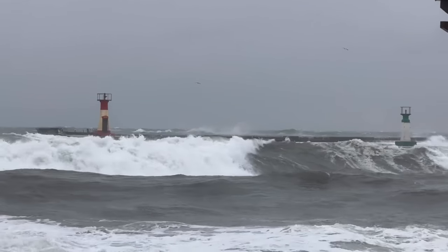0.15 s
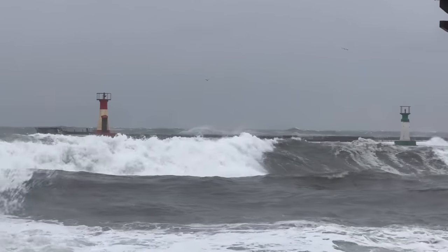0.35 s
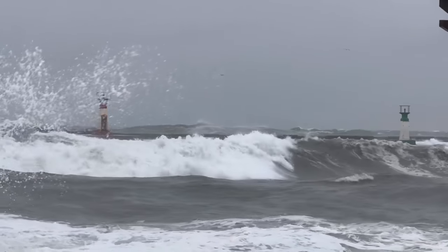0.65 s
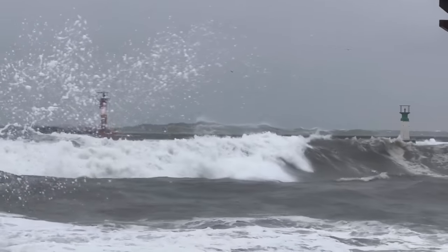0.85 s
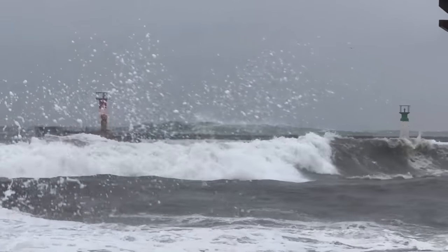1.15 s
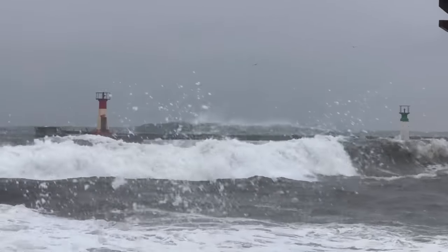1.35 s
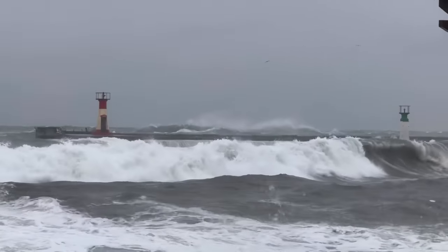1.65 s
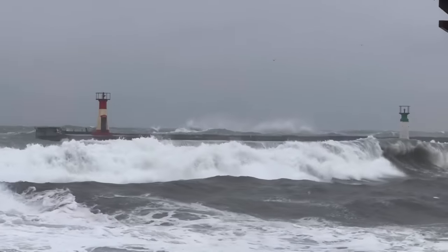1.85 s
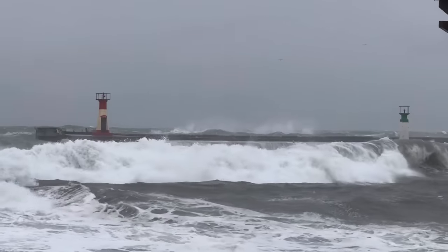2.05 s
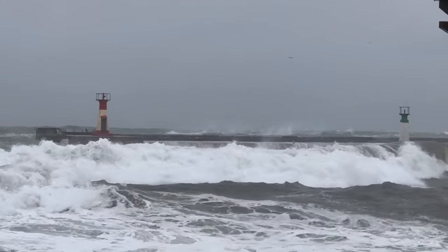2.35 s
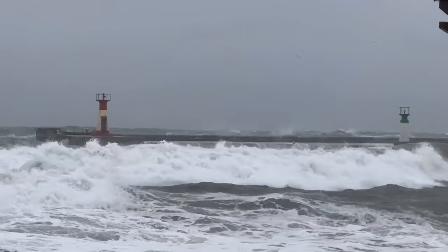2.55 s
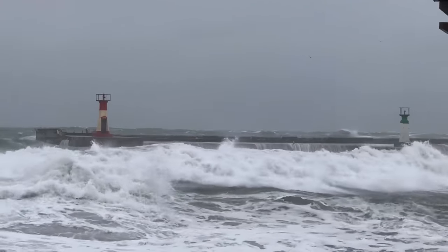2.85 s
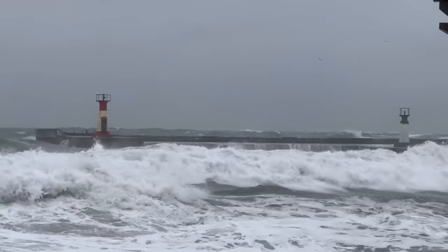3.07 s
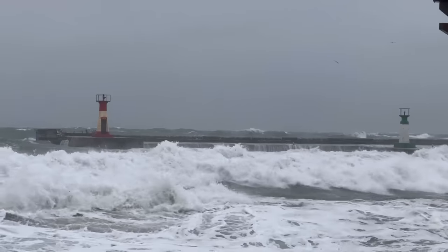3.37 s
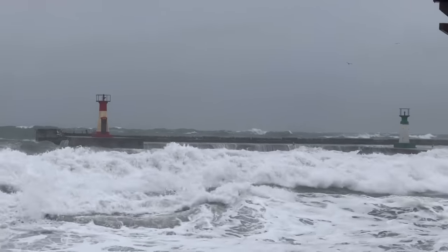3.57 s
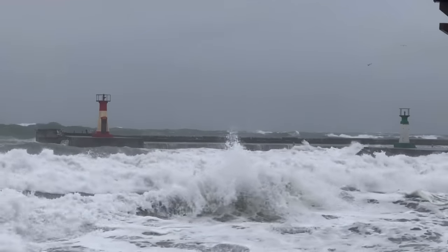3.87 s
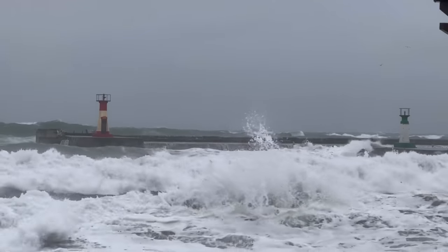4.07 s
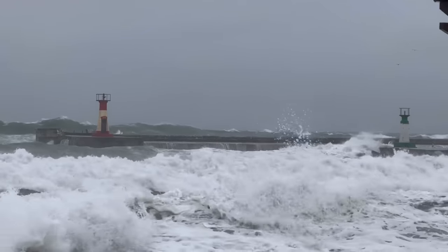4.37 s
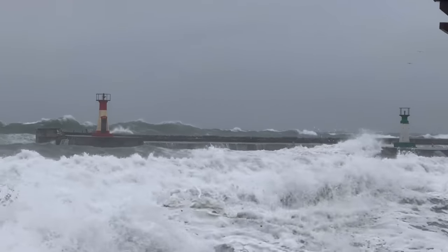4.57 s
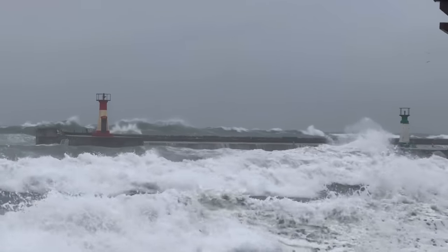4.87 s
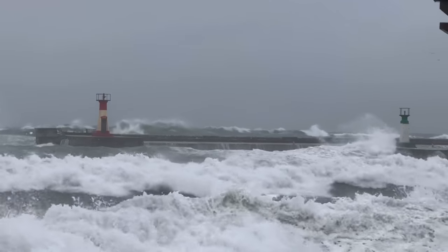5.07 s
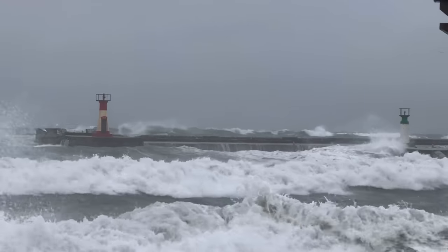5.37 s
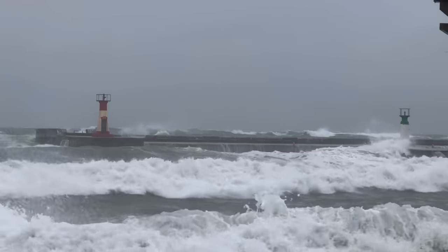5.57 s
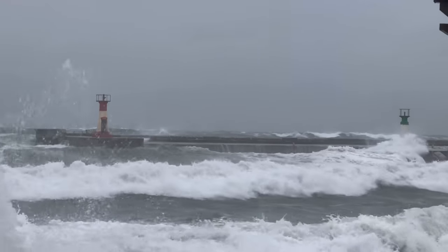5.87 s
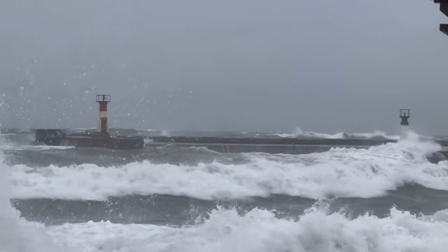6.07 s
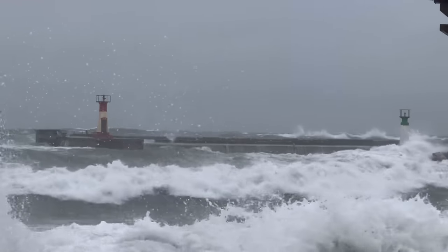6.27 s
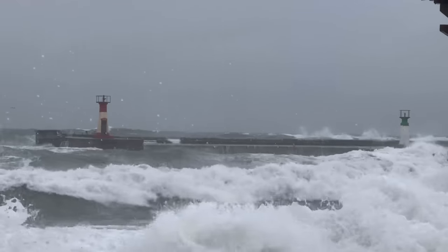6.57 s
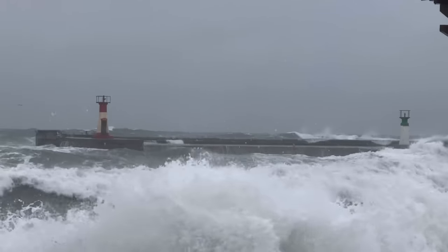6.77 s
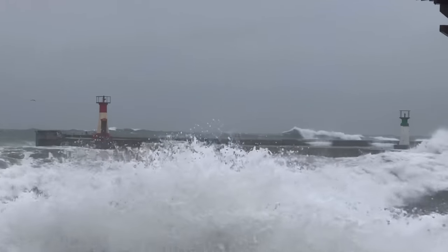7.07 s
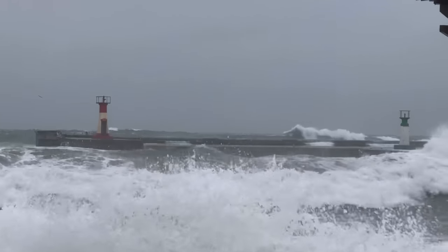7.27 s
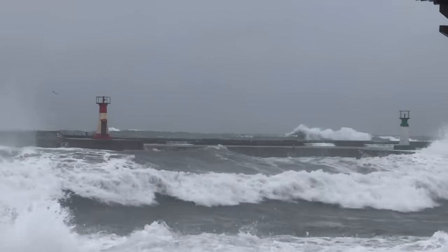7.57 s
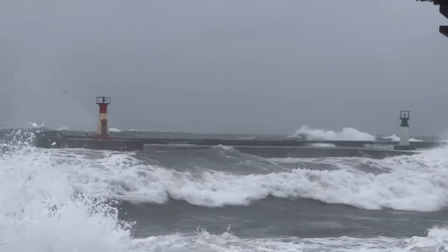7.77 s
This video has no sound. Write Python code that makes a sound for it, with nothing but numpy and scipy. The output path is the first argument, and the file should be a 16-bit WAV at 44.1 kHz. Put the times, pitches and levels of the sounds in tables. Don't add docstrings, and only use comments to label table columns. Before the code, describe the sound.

Lumpy low wind rumble buffets the microphone, with sharp downward-sliding pops, over a dull, patchy roar of slowed storm surf.

```python
import sys
import numpy as np
from scipy import signal
from scipy.fft import rfft, irfft
from scipy.io import wavfile
from scipy.ndimage import uniform_filter1d, minimum_filter1d

SR = 44100
rng = np.random.default_rng(int(sys.argv[2]) if len(sys.argv) > 2 else 0)


def digitize_waveform(pressure):
    field = np.atleast_2d(pressure).T
    bounded = np.clip(field, -1, 1)
    quanta = np.round(bounded * 32767).astype(np.int16)
    wavfile.write(sys.argv[1], SR, quanta)


def boost_factor(decibels):
    exponent = np.asarray(decibels, float) / 20
    return 10 ** exponent


N = 349272
STEP = 40
CONTROL_S = np.arange(0, N + STEP, STEP) / SR
HZ = np.maximum(np.fft.rfftfreq(N, 1 / SR), 1)
OCTAVES = np.log2(HZ)

# (lower edge [Hz], upper edge [Hz])
GUST_BANDS_HZ = [
    (25, 70),
    (70, 150),
    (150, 330),
]
# (frequency [Hz], density [dB per Hz])
GUST_COLOUR = [(20, -29.5), (35, -13), (55, 3), (70, 5.5), (100, 2), (150, -4.5), (230, -15.5), (330, -21),
               (500, -25.5), (800, -38), (1200, -59.5)]


def gusts():
    colour_db = at_hz(GUST_COLOUR + [(1500, -99)], HZ)
    swirl_db = in_time(WIND)[2]
    return turbulence(colour_db, GUST_BANDS_HZ, eddies(), swirl_db, lean=0.27, cavity_share=.3,
                      steady=0.69, cycles=2.5, shared_db=1.95, own_db=2.0, rate=14)


# (time [s], strength [dB], weight of the largest eddies [dB], extra unshared swirl [dB])
WIND = [(0, -24, -15.5, 4.5), (.3, -32.5, -9, 5), (.58, -30.5, -11, 3.5), (.9, -30, -3, 8.5),
        (1.3, -29, -1.5, -4), (1.8, -29, -3, -5.5), (2.4, -24, -2.5, -7.5), (3.2, -28.5, 1, -3),
        (3.7, -23, -3, 4.5), (4.3, -22.5, -5, 3), (4.6, -20.5, -8, 1.5), (5.1, -24, -1, 5),
        (5.6, -22.5, -6, 5), (5.85, -28, -6, 8), (6.05, -30, -6.5, -1.5), (6.5, -24.5, -6.5, -1.5),
        (7.1, -28.5, -3.5, -5), (7.9, -28, -6, -1)]
# (time [s], lift [dB], pitch [Hz], length [s])
LUMPS = [(0.008, 9, 95, .05), (0.343, 6.5, 200, 0.054), (0.445, 7.5, 99, 0.027), (0.722, 9.5, 200, 0.039),
         (0.906, 9, 92.6, .07), (0.988, 14.5, 70, 0.062), (1.224, 9, 101, 0.052), (1.614, 6.5, 76, 0.15),
         (1.67, 8.5, 45, 0.091), (2.05, 1.5, 70, 0.14), (2.31, -3, 50, .1), (2.554, 1, 50, 0.038),
         (2.726, 12, 80, 0.041), (3.004, 9, 68, 0.063), (3.14, 8.5, 45, 0.09), (3.5, 10.5, 41, .085),
         (3.557, -0.5, 123, 0.034), (3.803, 5.5, 132, 0.089), (3.835, -1, 48.5, 0.067),
         (4.065, 13, 57, .09), (4.2, 4.5, 69.6, .07), (4.28, 9, 50, .08), (4.78, 7.5, 85, 0.089),
         (5.064, 9.5, 99, 0.12), (5.398, 15, 56.3, 0.054), (5.448, 8.5, 153, 0.055), (5.55, 6, 54.6, 0.076),
         (6.364, 9, 80, 0.068), (6.952, 7.5, 103.6, .12), (7.116, 14.5, 80, 0.071)]
# (time [s], lift [dB], pitch [Hz], length [s])
LULLS = [(.06, -10, 40, .1), (0.435, -7, 45, .08), (.55, -5, 100, 0.12), (1.16, 2, 35, .1),
         (1.5, -4, 45, 0.088), (1.85, 1, 35, .15), (2.366, -9, 35, 0.088), (2.45, 0, 200, 0.12),
         (2.802, 4, 35, .08), (2.958, -5, 45, .08), (3.676, -2.5, 150, 0.064), (3.82, -5, 80, 0.15),
         (4.026, 2.5, 190, .08), (4.315, -4.5, 110, 0.11), (4.5, 0.5, 140, 0.12), (4.72, 3, 45, .06),
         (4.85, -5, 35, 0.061), (5.15, -8.5, 35, .08), (5.3, 3, 40, 0.089), (5.68, 4.5, 45, 0.09),
         (5.833, -3, 100, 0.04), (6.094, -4.5, 210, 0.14), (6.3, -6, 35, 0.071), (6.515, -4, 150, 0.078),
         (6.84, -5, 200, 0.11), (7.41, 3, 110, 0.055), (7.626, 1.5, 75, 0.2), (7.886, 3, 100, .04)]


def eddies():
    strength_db, weight_db, _ = in_time(WIND)
    flutter_db = -32 + 0.72 * (strength_db + 27)
    levels_db = np.array([strength_db + weight_db, strength_db, flutter_db])
    centres = centre_octaves(GUST_BANDS_HZ)
    reach_octaves = 0.99
    for s, lift_db, hz, length_s in LUMPS + LULLS:
        near = np.exp(-((centres - np.log2(hz)) / reach_octaves) ** 2)
        passing = np.exp(-(2 * (CONTROL_S - s) / length_s) ** 2)
        levels_db += lift_db * np.outer(near, passing)
    return levels_db


# (time [s], peak level [dB], starting pitch [Hz], length [s])
POPS = [(.004, -20, 170, .0093), (.102, -15, 240, 0.0053), (0.146, -11, 595, 0.0052),
        (.186, -12, 280, .0046), (.197, -11.5, 250, .0033), (.307, -14, 218, 0.0048),
        (.356, -12.5, 210, 0.0048), (0.449, -17, 277, 0.0069), (.804, -17, 248, 0.0064),
        (2.751, -10.5, 403, .005), (3.515, -15, 273, .0036), (3.576, -13.5, 377, 0.0054),
        (3.639, -8, 250, 0.0023), (3.977, -14, 366, 0.0064), (4.193, -20, 179, 0.01),
        (4.257, -7, 443, 0.0057), (4.533, -14.5, 330, .004), (4.728, -6, 646, 0.0034),
        (4.745, -8.5, 560, 0.0028), (5.13, -2, 465, 0.0043), (5.134, -1.5, 1064, 0.0032),
        (5.146, -5.5, 169, 0.0091), (5.349, -9, 348, 0.0039), (5.431, -2.5, 540, 0.0042),
        (5.444, -5, 296, .0058), (5.527, -8, 445, 0.0062), (5.589, -12, 377, 0.006),
        (5.806, -15, 310, .009), (6.368, -20, 620, 0.008), (7.113, -27, 300, 0.011)]


def pops():
    out = np.zeros(N + SR)
    t = np.arange(SR // 10) / SR
    rumble_hz, slide_lengths = 95, 1.41
    for s, db, hz, length_s in POPS:
        slide = np.exp(-t / max(slide_lengths * length_s, .001))
        pitch = rumble_hz + (hz - rumble_hz) * slide
        swell = (t / max(0.74 * length_s, .001)) ** 1.38
        shape = swell * np.exp(-swell)
        wave = np.sin(2 * np.pi * np.cumsum(pitch) / SR)
        at = round(s * SR)
        out[at:at + len(t)] += boost_factor(db) * shape / shape.max() * wave
    dulling = signal.butter(8, 980, fs=SR, output="sos")
    return signal.sosfilt(dulling, out[:N] + 1e-18)


# (lower edge [Hz], upper edge [Hz])
SURF_BANDS_HZ = [
    (450, 1250),
    (1400, 2600),
    (2900, 4400),
    (5000, 7200),
]
# (frequency [Hz], density [dB per Hz])
SURF_COLOUR = [(100, -4), (200, -4), (330, -4.5), (450, -1), (650, -2.5), (900, -0.5), (1300, -11.5),
               (1700, -18.5), (2400, -25.5), (3300, -36.5), (4300, -47.5), (6300, -60), (7300, -66.5),
               (8500, -81)]


def surf():
    colour_db = at_hz([(60, -99)] + SURF_COLOUR, HZ)
    return turbulence(colour_db, SURF_BANDS_HZ, breakers(), [0.], lean=0.87, cavity_share=.3,
                      steady=0.3, cycles=160.0, shared_db=0.58, own_db=0.65, rate=11)


# (time [s], level [dB])
FOAM = [(0.05, -81.5), (2.29, -80), (2.74, -81), (3.35, -82.5), (3.65, -77), (4.31, -78), (4.59, -76.5),
        (5.22, -73.5), (5.98, -77), (6.55, -75), (6.78, -74.5), (6.98, -76), (7.7, -71), (7.85, -78)]
FOAM_FAR_DB = [-29.5, -47, -67.5, -81.5]
FOAM_FOLLOWS = [.2, .4, .6, 1.2]
# (time [s], lift [dB])
CRASHES = [(.95, 2.5), (1.75, 1), (2.25, 3.5), (3.53, 4), (3.599, 4), (3.68, 4), (3.78, 3), (5.72, -0.5),
           (6.501, -2), (7.099, -1.5), (7.38, 2.5), (7.599, 2.5), (7.8, 4)]


def breakers():
    attack_s, release_s = 0.022, 0.054
    crash_db = 0
    for s, lift_db in CRASHES:
        after = CONTROL_S - s
        crash_db = crash_db + lift_db * np.exp(np.minimum(after / attack_s, -after / release_s))
    near_db = in_time(FOAM)[0] - FOAM_FAR_DB[-1]
    foam_db = np.c_[FOAM_FAR_DB] + np.outer(FOAM_FOLLOWS, near_db)
    return foam_db + np.outer([.2, .7, 1.1, .4], crash_db)


# (frequency [Hz], width [Hz], gain [dB])
CAVITY = [
    (843.6, 110, 6),
    (952.6, 96, -14),
    (1116, 84, 4.5),
]
# (frequency [Hz], level [dB])
UNSHARED = [(40, -14), (100, -17), (180, -12.5), (300, -15), (500, -13.5), (750, -15.5), (1100, -13.5),
            (1400, -5), (1850, -5.5), (2200, -10), (3500, -7), (4600, -14), (5500, -36)]
# (frequency [Hz], left over right [dB])
LEAN = [(60, 2.1), (200, 3.5), (400, 2.5), (780, 4.5), (1000, 0.8), (1300, -2.5), (1800, 0.7), (3000, -0.5)]
# (frequency [Hz], left leads by [rad])
LEAD = [(60, 0.13), (520, 0.92), (900, 0.042), (1210, -.2), (1640, 0.35), (2760, 0.15), (4500, .01)]


def turbulence(colour_db, bands_hz, levels_db, swirl_db, lean, cavity_share, steady, cycles,
               shared_db, own_db, rate):
    cavity_db = sum(db / (1 + (2 * (HZ - hz) / width) ** 2) for hz, width, db in CAVITY)
    tilt = boost_factor(lean * at_hz(LEAN, HZ) / 2) * np.exp(.5j * at_hz(LEAD, HZ))
    shared, unshared = rfft(rng.standard_normal((2, N)))
    unshared = rfft(irfft(unshared, N) * per_sample(boost_factor(swirl_db)))
    shared = shared * boost_factor(colour_db + cavity_db)
    unshared = unshared * boost_factor(colour_db + cavity_share * cavity_db + at_hz(UNSHARED, HZ))
    ports = np.array([shared * tilt + unshared, shared / tilt - unshared])
    power = 2 * np.abs(ports.mean(axis=0) / N) ** 2
    band_db = [[10 * np.log10(power[(HZ > lo) & (HZ < hi)].sum())] for lo, hi in bands_hz]
    trims_db = levels_db - band_db
    centres = centre_octaves(bands_hz)
    out, together = 0, drift(rate / 3)
    for octave in np.arange(4.5, 13.6, .5):
        inside = slice(*np.searchsorted(OCTAVES, [octave - .5, octave + .5]))
        if np.max(colour_db[inside]) < -70:
            continue
        part = np.zeros_like(ports)
        part[:, inside] = ports[:, inside] * np.cos(np.pi * (OCTAVES[inside] - octave)) ** 2
        band = irfft(part, N)
        beats = uniform_filter1d(np.mean(band ** 2, axis=0), int(cycles * SR / 2 ** octave) + 2)[::STEP]
        even = (beats.mean() / (beats + 0.044 * beats.mean())) ** (np.clip(steady, 0, 1) / 2)
        weights = [np.interp(octave, centres, row) for row in np.eye(len(centres))]
        gain = boost_factor(weights @ trims_db + shared_db * together + own_db * drift(rate))
        out = out + band * per_sample(gain[:len(even)] * even)
    return out


def drift(rate):
    r = np.exp(-2 * np.pi * STEP * rate / SR)
    slow = signal.lfilter([1], [1, -2 * r, r * r], rng.standard_normal(N // STEP + 2002))
    return slow[-len(CONTROL_S):] / slow.std()


def centre_octaves(bands_hz):
    return np.log2(np.prod(bands_hz, axis=1)) / 2


def in_time(rows):
    s, *columns = np.transpose(rows)
    return np.array([np.interp(CONTROL_S, s, column) for column in columns])


def at_hz(points, hz):
    table_hz, values = np.transpose(points)
    return np.interp(np.log(hz), np.log(table_hz), values)


def per_sample(steps):
    return np.interp(np.arange(N) / STEP, np.arange(len(steps)), steps)


def scene():
    return gusts() + surf() + pops() * boost_factor([[-1.7], [-2.3]])


def roll_off(x):
    return signal.sosfilt(signal.butter(12, 15300, fs=SR, output="sos"), x)


def record(dry):
    dry = dry * np.minimum(np.arange(N) / (0.003 * SR), 1)
    dry = signal.sosfilt(signal.butter(2, 28, "high", fs=SR, output="sos"), dry)
    room = minimum_filter1d(np.minimum(.89 / (np.abs(dry).max(axis=0) + 1e-9), 1), size=401)
    dry = dry * uniform_filter1d(uniform_filter1d(room, size=200), size=200)
    bass = signal.sosfilt(signal.butter(3, 330, fs=SR, output="sos"), dry.mean(axis=0))
    mirror_hz = 9600
    mirror = boost_factor(-62.5) * bass * np.cos(2 * np.pi * mirror_hz * np.arange(N) / SR)
    hiss_band = signal.butter(4, [13100, 15100], "band", fs=SR, output="sos")
    hiss = boost_factor(-85.5) * signal.sosfilt(hiss_band, rng.standard_normal((2, N)))
    return roll_off(dry + mirror + hiss)


dry = scene()
out = record(dry)
digitize_waveform(out)
```